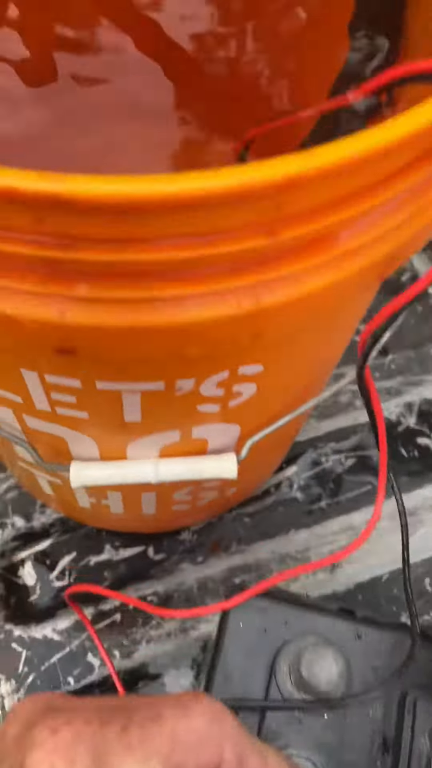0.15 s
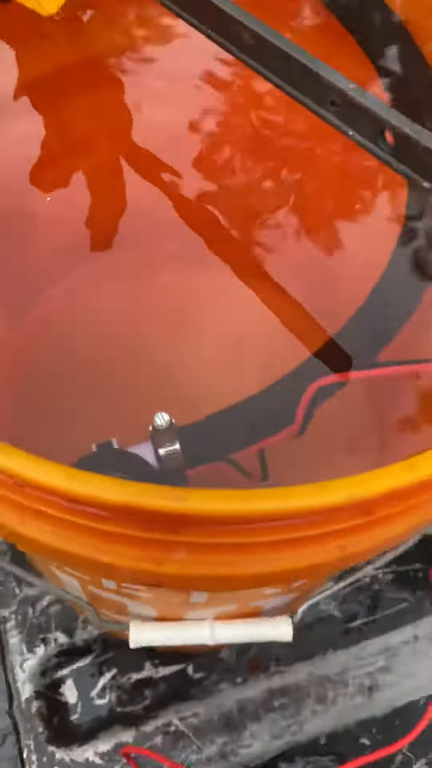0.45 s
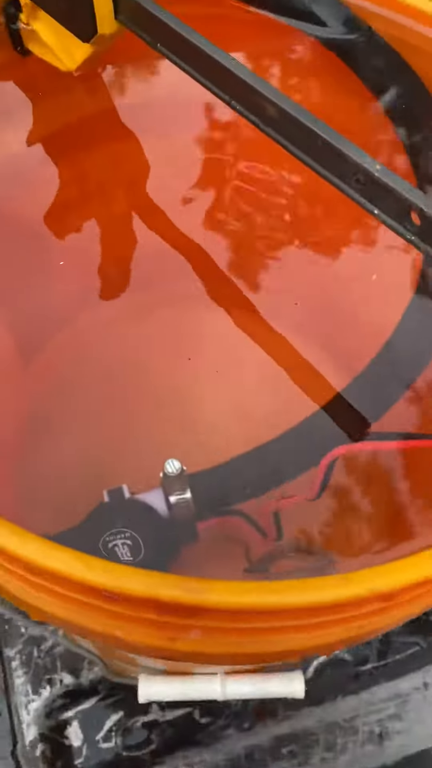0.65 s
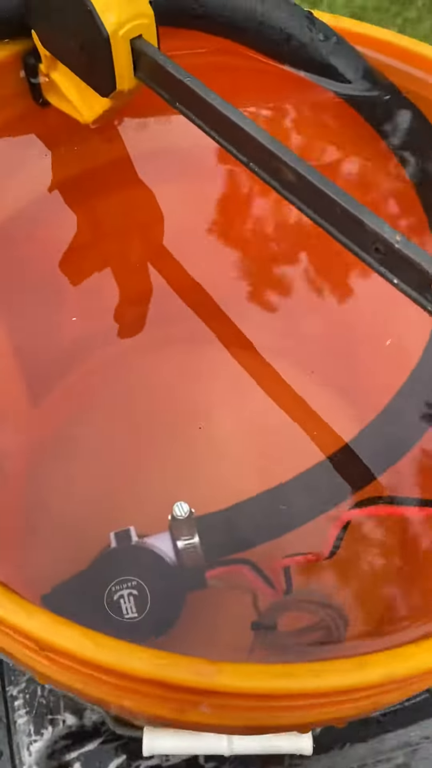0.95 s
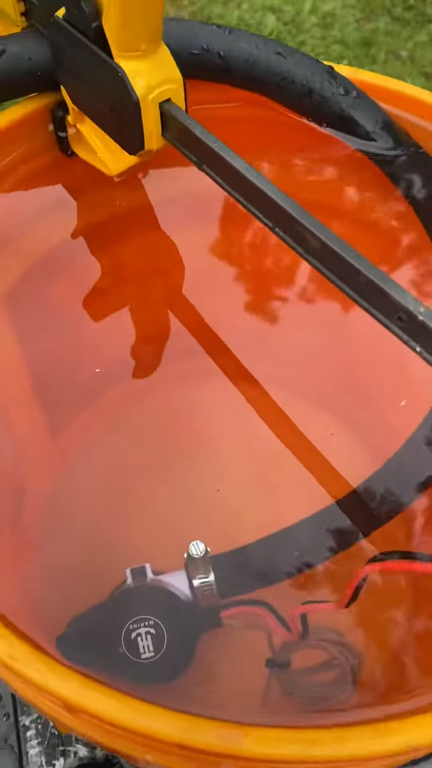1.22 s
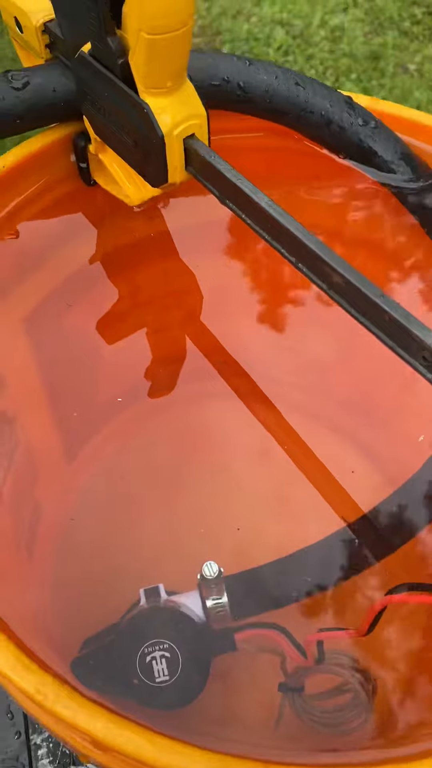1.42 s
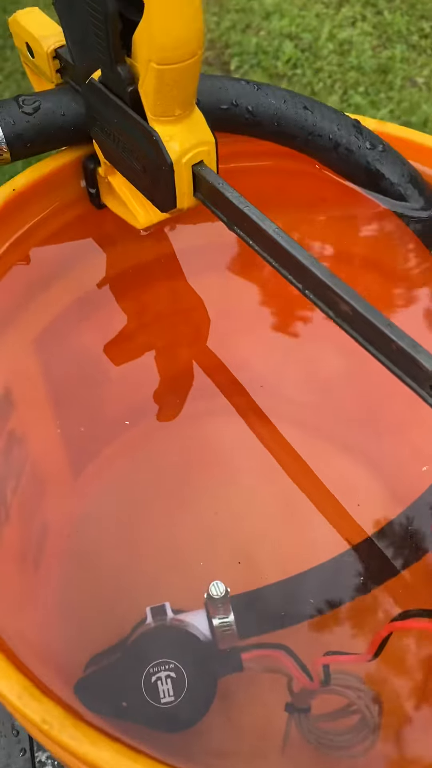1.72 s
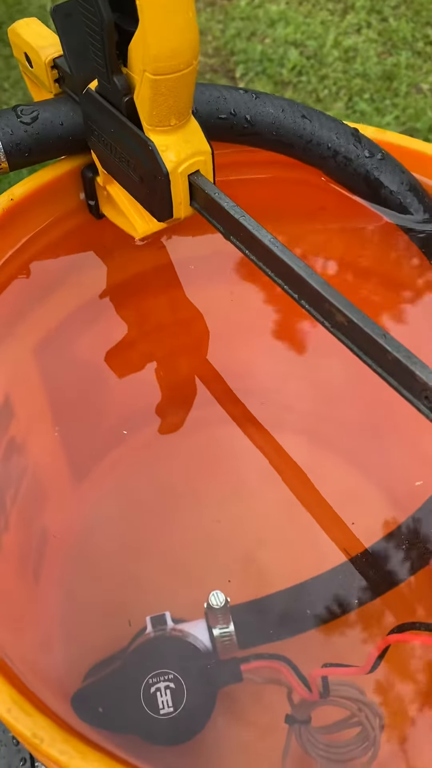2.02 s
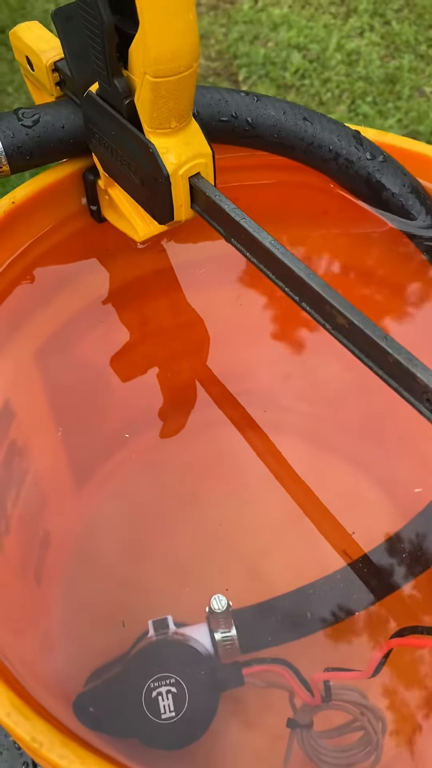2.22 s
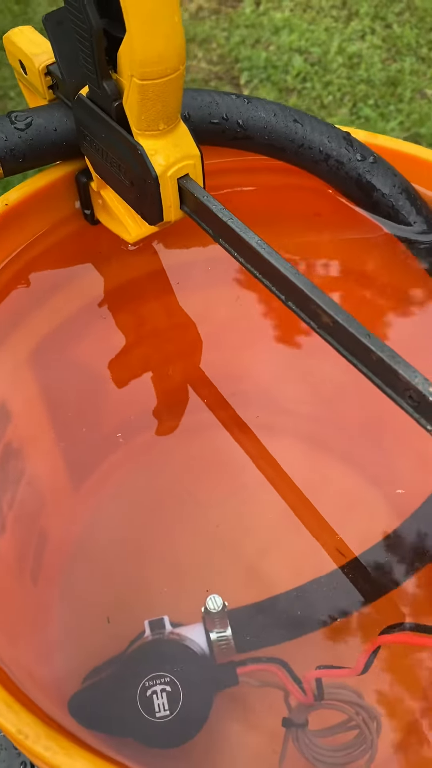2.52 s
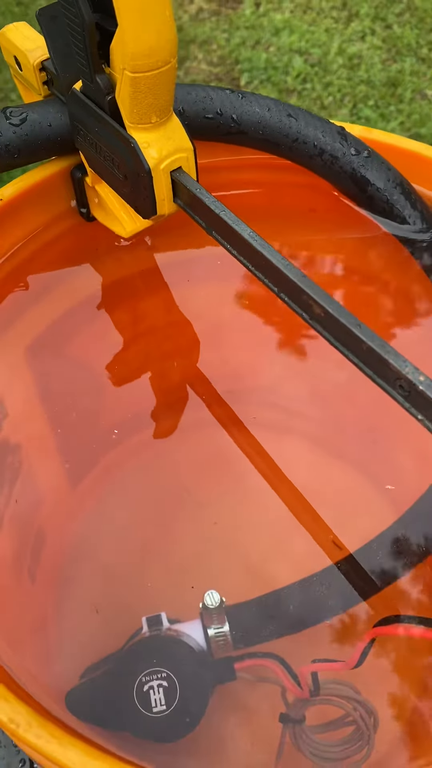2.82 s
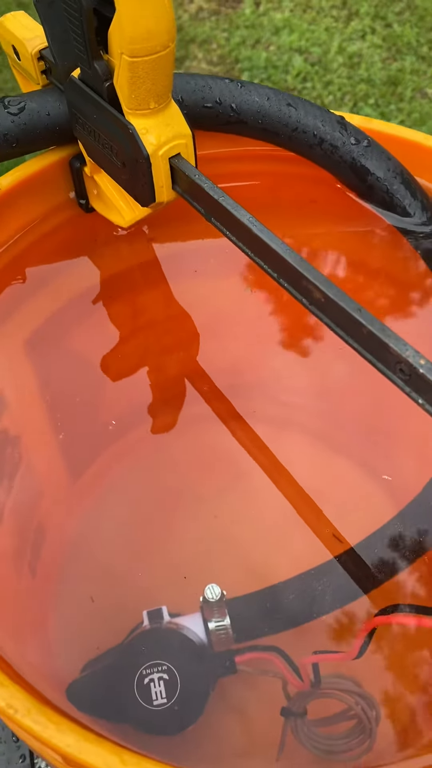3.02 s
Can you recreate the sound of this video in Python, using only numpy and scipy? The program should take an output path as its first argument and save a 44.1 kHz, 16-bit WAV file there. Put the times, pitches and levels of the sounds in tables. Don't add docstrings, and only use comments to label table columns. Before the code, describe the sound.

A small electric pump runs underwater in a plastic bucket for about three seconds, a low steady hum near 110 hertz with wet, hollow rumble and soft fizzing hiss. At 0.1 seconds a loud metallic click strikes, with smaller ticks and scrapes until 0.3. Faint drips and bubble blips follow, one slightly clearer near 2.3. The rumble peaks around 0.8, then gently eases. Close handheld phone, outdoors.

```python
import sys
import numpy as np
from scipy import signal
from scipy.fft import rfft, irfft, next_fast_len
from scipy.io import wavfile
from scipy.ndimage import uniform_filter1d

SR = 44100
rng = np.random.default_rng(int(sys.argv[2]) if len(sys.argv) > 2 else 0)


def to_linear_factor(level_db):
    exponent = np.asarray(level_db, float) / 20
    return 10 ** exponent


def wav_out(sig):
    wavfile.write(sys.argv[1], SR, np.round(np.clip(np.atleast_2d(sig).T, -1, 1) * 32767).astype(np.int16))


N = 139356

# time_s, rumble_db, fizz_db
SWING = [
    (0.0, -39.5, -54),
    (0.13, -38, -50.5),
    (0.26, -37, -49),
    (0.51, -37, -49.5),
    (0.76, -36, -49.5),
    (1.13, -38.5, -47.5),
    (1.46, -38.5, -47),
    (1.94, -39, -48.5),
    (2.22, -40, -47.5),
    (3.16, -42.5, -48),
]
# multiple_of_shaft, level_db, waver_db
SHAFT_ORDERS = [(.5, -55, 5), (1, -44.5, 1.5), (2, -53, 1), (2.5, -57, 3), (4, -56, 3), (6, -61, 8),
                (7, -58.5, 4), (10, -51.5, 2.5), (11, -68, 5.5), (17, -58, 0)]
# pitch_hz, width_hz, level_db
BUCKET_MODES = [(73.4, 16, -6), (224.5, 27, -9), (273.6, 11.7, -7), (390.2, 50, 2), (438, 23, -15),
                (720, 14, -12.5), (765.7, 31, -2), (1208, 67, -10.5), (1892, 155, -4.5), (2033, 170, -5)]
# pitch_hz, level_db_per_hz
CHURN_COLOUR = [(24, -49), (40, -3), (103, -4.5), (387, -8.5), (579, -13.5), (766, -10), (912, -9.5),
                (1870, -17), (2600, -24.5), (3380, -25), (5720, -120)]
# pitch_hz, width_hz, depth_0_to_1
HOLLOWS = [(287, 21, 0.63), (600, 26, 0.95), (730, 23, 0.22), (880, 125, 0.51)]
# pitch_hz, level_db_per_hz
FIZZ_COLOUR = [(1500, -15), (2500, -4), (3000, -0.1), (4600, -1), (6000, -7), (9600, -9.5), (10000, -14.5),
               (15700, -15)]
# start_s, peak_db, centre_hz, spread_octaves, scrape_s
WIRE_TAPS = [(.0668, -24.5, 2050, .12, 0.0044), (.0986, -11.5, 2830, 0.8, 0.0047),
             (.1055, -16.5, 3040, 0.8, 0.0035), (.1052, -19.5, 7850, 0.26, 0.009),
             (.1088, -18, 2540, 1, 0.0042), (.1125, -21, 2550, 0.33, 0.022),
             (.0988, -28, 15000, 0.4, 0.0038), (.1055, -38, 14800, .3, .004),
             (.127, -29, 4900, 1.6, 0.0024), (.141, -30, 10000, 0.55, 0.0075),
             (.1448, -34, 9900, .7, 0.0031), (.1748, -27.5, 5400, 0.54, 0.004),
             (.1886, -29, 14700, .3, 0.0037), (.1889, -30, 7600, 0.78, 0.0035),
             (.1982, -17, 7000, 0.41, 0.0071), (.204, -25, 4800, 0.45, 0.0077),
             (.2125, -38, 9400, .5, 0.0028), (.2714, -25.5, 4530, 0.46, 0.0038),
             (.2716, -29, 13500, 0.52, .002), (.2785, -25, 6400, 0.79, 0.005),
             (.292, -28, 5470, 0.48, 0.0036), (.2998, -25, 9500, .5, .0015),
             (.3158, -22.5, 8400, 1.1, 0.00094), (.318, -40, 11000, 0.2, 0.0025),
             (.3202, -28, 4600, 0.53, 0.0035)]
# start_s, peak_db, centre_hz, spread_octaves, scrape_s
DROPS = [(.437, -29, 5540, 1.3, .002), (.724, -25.5, 1670, 0.38, 0.0062),
         (.8178, -28.5, 7600, 0.26, 0.0033), (.818, -39, 13200, 0.26, 0.0024),
         (.888, -36, 14000, 0.37, 0.0022), (.946, -25, 3500, 0.45, 0.0022),
         (.9458, -33, 10000, 0.83, 0.0026), (1.386, -42, 13800, 0.25, .003),
         (1.754, -34, 3200, 0.37, 0.0015), (2.053, -31, 3180, 0.23, 0.0039),
         (2.29, -27.5, 1400, 0.3, 0.0029), (2.499, -32, 4520, 0.15, 0.0055)]
# pitch_hz, t60_s
POST_MODES = [(1400, .008), (2020, .009), (2400, .007), (2780, .008), (3200, .008), (3750, .008),
              (4700, .008), (5400, .008), (6200, .007), (7600, .006), (9400, .005), (11500, .004),
              (13200, .004), (14800, .004)]
# pitch_hz, t60_s, level_under_tap_db
CASE_MODES = [(171, 0.051, -15), (348, 0.0094, -14), (536, 0.14, -24.5), (780, 0.023, -32),
              (1134, 0.0048, -58)]
# start_s, peak_db,
# pitch_hz, rise_s, t60_s
PINGS = [(0.0989, -3.5, 2063, 0.0011, 0.0092), (.0992, -14, 3300, 0.00082, 0.015),
         (.1032, -20, 1980, 0.00036, 0.022), (0.1086, -8.5, 1990, .001, 0.01),
         (0.1087, -6, 3106, 0.00075, 0.018), (0.1094, -1, 2800, 0.00053, 0.0055),
         (0.1973, -21.5, 5405, 0.00059, 0.029), (0.1988, -19, 2789, 0.0025, 0.029),
         (0.199, -31, 4640, 0.0009, .04), (0.2113, -15.5, 2710, 0.00081, 0.01),
         (.2112, -19.5, 3230, 0.0012, 0.015), (0.2126, -21, 4870, 0.00058, 0.015),
         (.32, -26.5, 4740, 0.00082, .018), (2.2812, -22, 1915, 0.0018, 0.018),
         (2.287, -29, 1880, 0.0017, .025),
         (.0986, -22, 1300, 0.0011, .01), (.0988, -24.5, 620, .0015, 0.012), (.099, -27, 310, .002, 0.025),
          (.109, -21, 1300, 0.00077, 0.0049), (.112, -27.5, 765, .006, 0.096),
          (.2003, -27.5, 3550, .001, .025), (.2055, -35, 3300, .001, .02), (.3162, -26, 1900, .001, 0.011),
          (.405, -32, 365, 0.024, 0.087), (.8, -37.5, 410, 0.025, .12), (1.605, -31, 392, 0.018, 0.25),
          (1.545, -41, 740, 0.022, 0.17), (2.26, -40, 750, 0.021, 0.26), (1.12, -41, 275, 0.13, 0.84),
          (2.031, -32, 1900, .003, 0.032), (.1982, -26, 6150, .001, .02), (.2718, -30, 4050, 0.00085, .015),
          (.2925, -32, 4800, .001, .015), (.1095, -26, 1600, 0.0013, 0.009)]
# pitch_hz, width_hz, level_under_fizz_db
BRUSH_BANDS = [(9150, 250, -22), (9500, 120, -17)]
# pitch_hz, phase_radians
PORT_LEAD = [(2200, 0), (2600, 1.6), (4500, 1.1), (5000, .3), (7300, 3.14), (10550, 6.28), (13500, 9.42),
             (16200, 12.57)]
# pitch_hz, left_minus_right_db
PORT_TILT = [(300, 0), (700, .6), (1300, -.9), (3000, -1.5), (4300, 0), (5000, 1.2), (6000, 0)]
# pitch_hz, share_db
PORT_DIFFUSE = [(60, -33), (110, -36), (270, -23), (450, -14), (740, -14), (1220, -17), (2000, -15.5),
                (2500, -6), (6000, -9)]

SHAFT_START_HZ, SHAFT_HZ, SETTLE_S, SPEED_WOBBLE = 108.2, 110.2, 0.33, 0.0022
ORDER_WAVER = 0.5
CHURN_DB, RING_DB, GURGLE_DB = -0.5, 0.5, 2.3
BASS_SHARE = 0.054
WALL_LOW_HZ, WALL_HIGH_HZ, WALL_FROM_S, WALL_FADE_DB_PER_S = 700, 800, 1.9, 7.5
FIZZ_DB, BUBBLES_PER_S, BUBBLES_DB = 2.5, 400, -12.5
SKIRT_DB = -10
WIRE_SIDE, WIRE_SIDE_HZ = 1.9, 2100.0
BRUSH_FADE_DB_PER_S = 1
PORT_LOW_CUT_HZ, TOP_HZ = 45, 15800
SUM_MUTE_DB, DIFFERENCE_MUTE_DB, MUTE_FROM_HZ, SUDDEN_DB = -3.3, -5.2, 5600, 2.2
NARROW_DB, NARROW_LOW_HZ, NARROW_HIGH_HZ = -15.5, 850, 2300


def motor():
    t = np.arange(N) / SR
    settling_hz = SHAFT_HZ + (SHAFT_START_HZ - SHAFT_HZ) * np.exp(-t / SETTLE_S)
    shaft_hz = settling_hz * (1 + SPEED_WOBBLE * slow(7.77))
    turns = np.cumsum(shaft_hz) / SR
    hum = np.zeros(N)
    for multiple, db, waver_db in SHAFT_ORDERS:
        level = to_linear_factor(db + ORDER_WAVER * min(waver_db, 7) * slow(14.0))
        tone = np.sqrt(2) * np.sin(2 * np.pi * (multiple * turns + rng.random()))
        hum += wall(multiple * SHAFT_HZ) * level * tone
    return hum


def bucket():
    white = rng.standard_normal((2, N))
    rings = np.zeros((2, N))
    for hz, width_hz, db in BUCKET_MODES:
        gurgle_db = GURGLE_DB * (hz < 900) * slow(8.0)
        rings += wall(hz) * to_linear_factor(db + gurgle_db) * evened(ring_twice(white, hz, 1.4 * width_hz))
    colour = [*CHURN_COLOUR, (3200, -41)]
    churn = noise(colour, patchy_db=1.58, flicker_db=0.94, size=1024)
    body = to_linear_factor(CHURN_DB) * churn + to_linear_factor(RING_DB - 2) * rings / 2
    for hz, width_hz, depth in HOLLOWS:
        body = body - min(depth, 0.9) * ring(body, hz, width_hz)
    level_db = swing(axis=1)
    steady_db = np.median(level_db)
    bass = signal.sosfiltfilt(signal.butter(2, 300.0, fs=SR, output="sos"), body)
    bass_db = steady_db + BASS_SHARE * (level_db - steady_db)
    return to_linear_factor(level_db) * (body - bass) + to_linear_factor(bass_db) * bass


def wall(hz):
    turned_s = np.maximum(np.arange(N) / SR - WALL_FROM_S, 0)
    return to_linear_factor(-WALL_FADE_DB_PER_S * turned_s * (WALL_LOW_HZ < hz < WALL_HIGH_HZ))


def fizz():
    bursts = to_linear_factor(4.5 * np.minimum(rng.exponential(1, N), 3)) * (rng.random(N) < BUBBLES_PER_S / SR)
    kind = rng.integers(0, 16, N)
    pops = np.zeros(N)
    for k, hz in enumerate(np.geomspace(1800.0, 12000.0, 16)):
        pops += to_linear_factor(read(FIZZ_COLOUR, hz)) * evened(ring_twice(bursts * (kind == k), hz, hz / 6))
    hiss = noise(FIZZ_COLOUR, patchy_db=1.4, flicker_db=0.4, size=512)
    direct_pops = to_linear_factor(BUBBLES_DB) * evened(pops) * [[1], [0]]
    return to_linear_factor(swing(axis=2) + FIZZ_DB) * (hiss + direct_pops)


def taps(events, case_db):
    out = np.zeros(N + 3000)
    t = np.arange(3000) / SR
    for start_s, db, centre_hz, spread, scrape_s in events:
        u = t / max(scrape_s, 2e-4)
        scrape = rng.standard_normal(3000) * np.sqrt(u) * np.exp(-2.5 * u * u)
        sound = np.zeros(3000)
        for hz, t60 in POST_MODES:
            near_centre = np.exp(-(np.log2(hz / centre_hz) / spread) ** 2)
            skirt = to_linear_factor(SKIRT_DB) * min(spread, centre_hz / hz)
            sound += (near_centre + skirt) * evened(ring_twice(scrape, hz, 4 / t60))
        knock = np.zeros(3000)
        for hz, t60, under_db in CASE_MODES:
            knock += to_linear_factor(under_db - 60 * t / t60) * np.sin(2 * np.pi * hz * t)
        out[round(start_s * SR):][:3000] += to_linear_factor(db) * (sound / abs(sound).max() + to_linear_factor(case_db) * knock)
    return out[:N]


def pings():
    out = np.zeros(N + SR)
    t = np.arange(SR) / SR
    for start_s, db, hz, rise_s, t60 in PINGS:
        decay = to_linear_factor(db - 60 * np.maximum(t - rise_s, 0) / t60)
        rise = np.minimum(t / rise_s, 1)
        out[round(start_s * SR):][:SR] += decay * rise * np.sin(2 * np.pi * hz * t)
    return out[:N]


def brushes():
    white = rng.standard_normal(N)
    bands = sum(to_linear_factor(db) * evened(ring_twice(white, hz, width_hz)) for hz, width_hz, db in BRUSH_BANDS)
    return to_linear_factor(swing(axis=2) - BRUSH_FADE_DB_PER_S * np.arange(N) / SR) * bands


def evened(x):
    return x / np.sqrt(np.mean(x ** 2) + 1e-20)


def read(points, hz):
    f, value = np.transpose(points)
    return np.interp(np.log(hz + 1), np.log(f + 1), value)


def swing(axis):
    rows = np.array(SWING)
    return np.interp(np.arange(N) / SR, rows[:, 0], rows[:, axis])


def slow(top_hz):
    t = np.arange(0, N + 64, 64) / SR
    f = np.geomspace(top_hz / 20, top_hz, 20)
    drift = np.sin(2 * np.pi * (f * t[:, None] + rng.random(20))) @ f ** -0.5
    return np.interp(np.arange(N) / SR, t, evened(drift))


def ring(x, hz, width_hz):
    r = np.exp(-np.pi * width_hz / SR)
    w = 2 * np.pi * hz / SR
    return signal.lfilter([(1 - r * r) / 2, 0, -(1 - r * r) / 2], [1, -2 * r * np.cos(w), r * r], x)


def ring_twice(x, hz, width_hz):
    return ring(ring(x, hz, width_hz), hz, width_hz)


def noise(colour, patchy_db, flicker_db, size):
    frames = 4 * N // size + 5
    hz = np.fft.rfftfreq(size, 1 / SR)
    a, b, c, d, patches = rng.standard_normal((frames, len(hz), 5)).T
    patches = evened(uniform_filter1d(uniform_filter1d(patches, size=9, axis=0), size=9, axis=1))
    flicker = rng.standard_normal(frames)
    field_db = read(colour, hz)[:, None] + patchy_db * patches + flicker_db * flicker
    z = np.array([a + 1j * b, c + 1j * d]) * to_linear_factor(field_db) * (hz[:, None] < TOP_HZ)
    return evened(signal.istft(z, nperseg=size, noverlap=3 * size // 4)[1][:, :N])


def scene():
    ticks = taps(DROPS, 1.0) + taps(WIRE_TAPS, -6.0) + pings()
    low_pass = signal.butter(4, WIRE_SIDE_HZ, fs=SR, output="sos")
    aslant = signal.sosfilt(low_pass, signal.hilbert(ticks).imag)
    water = bucket() + fizz()
    pump = [[1], [0]] * (motor() + brushes())
    return water + pump + np.array([ticks, WIRE_SIDE * aslant])


def joint(pair):
    sum_difference = np.array([pair[0] + pair[1], pair[0] - pair[1]]) / 2
    hz, _, z = signal.stft(sum_difference, SR, nperseg=1024)
    power = uniform_filter1d(uniform_filter1d(abs(z) ** 2, size=9, axis=1), size=3, axis=2) + 1e-20
    high = hz > MUTE_FROM_HZ
    treble = (abs(z[:, high]) ** 2).sum((0, 1))
    calm = treble < np.median(treble) * to_linear_factor(2 * SUDDEN_DB)
    narrow = (hz > NARROW_LOW_HZ) & (hz < NARROW_HIGH_HZ)
    high_db = np.array([[SUM_MUTE_DB], [DIFFERENCE_MUTE_DB]])
    limit_db = np.where(high, high_db, np.where(narrow, NARROW_DB, -99))
    mute = (power < power[::-1] * to_linear_factor(2 * limit_db)[..., None]) & calm
    mid, side = signal.istft(z * ~mute, SR, nperseg=1024)[1][:, :N]
    return np.array([mid + side, mid - side])


def top_cut(x):
    return signal.sosfilt(signal.butter(12, 17130, fs=SR, output="sos"), x)


def record(dry):
    size = next_fast_len(N + 4096)
    hz = np.fft.rfftfreq(size, 1 / SR)
    near, diffuse = rfft(dry, size)
    half = to_linear_factor(read(PORT_TILT, hz) / 2) * np.exp(0.5j * np.interp(hz, *np.transpose(PORT_LEAD)))
    apart = to_linear_factor(read(PORT_DIFFUSE, hz)) * diffuse
    pair = np.array([(near + apart) * half, (near - apart) / half])
    low_cut = 1 / np.sqrt(1 + (PORT_LOW_CUT_HZ / (hz + 1)) ** 14)
    pair *= low_cut * (hz < TOP_HZ + 300)
    mix = joint(irfft(pair, size)[:, :N])
    return top_cut(mix)


dry = scene()
out = record(dry)
wav_out(out)
```